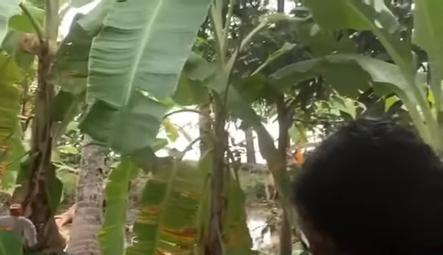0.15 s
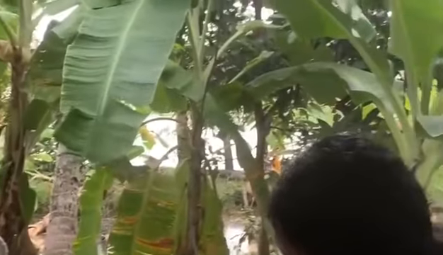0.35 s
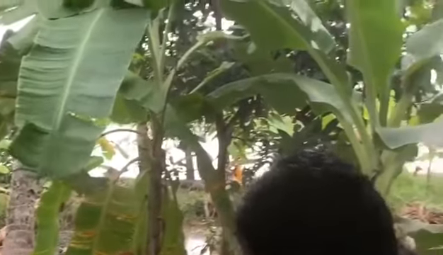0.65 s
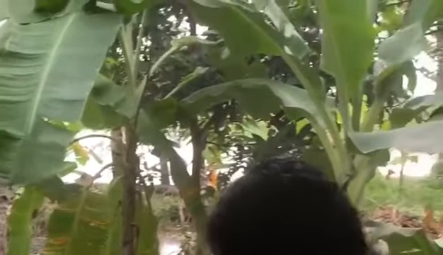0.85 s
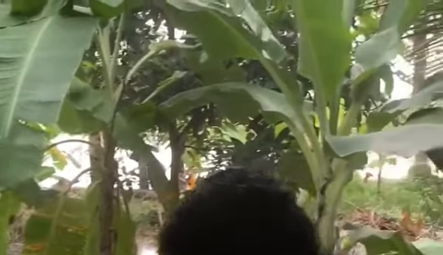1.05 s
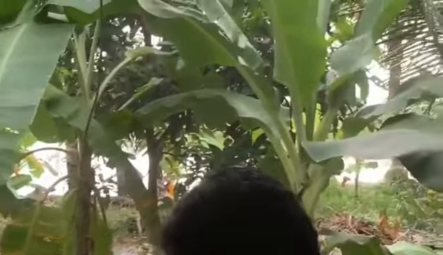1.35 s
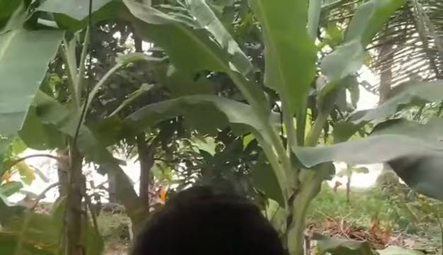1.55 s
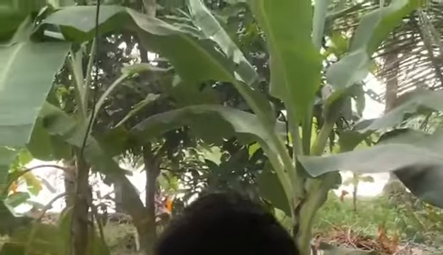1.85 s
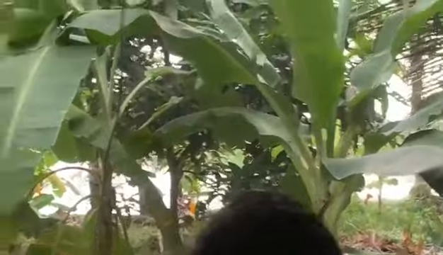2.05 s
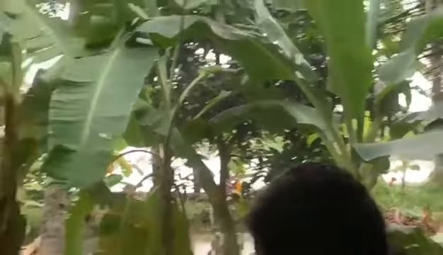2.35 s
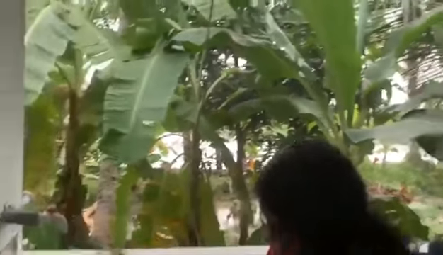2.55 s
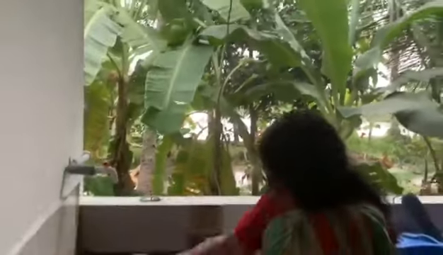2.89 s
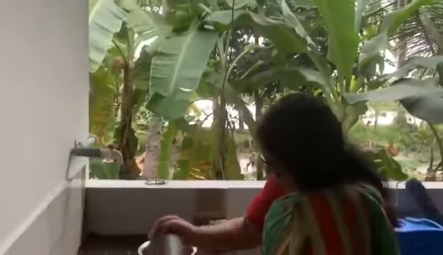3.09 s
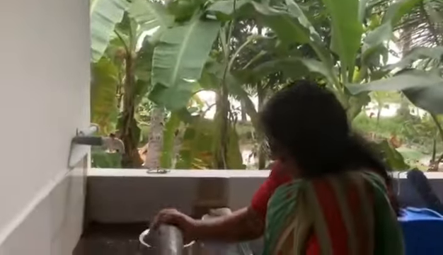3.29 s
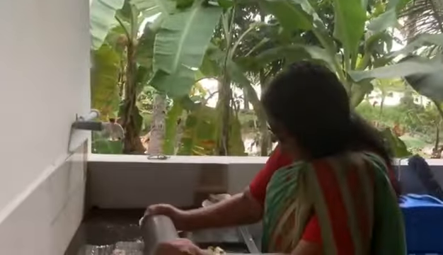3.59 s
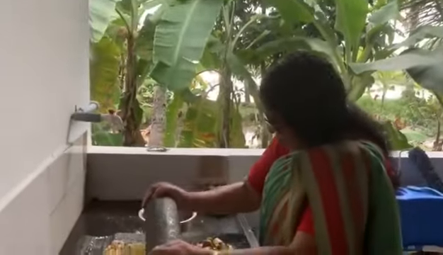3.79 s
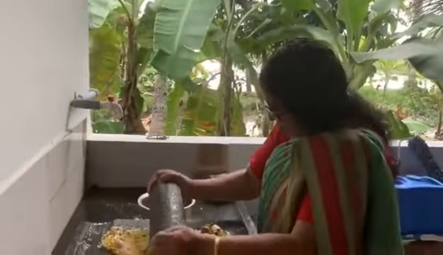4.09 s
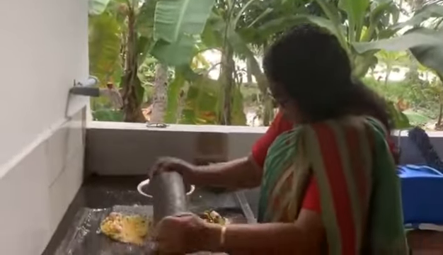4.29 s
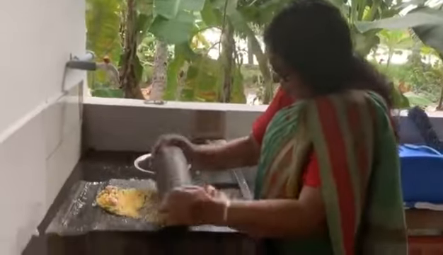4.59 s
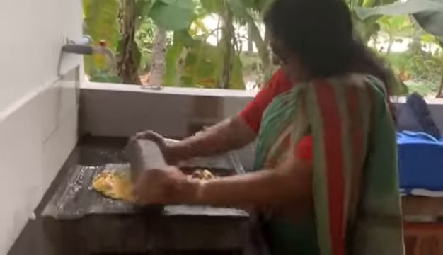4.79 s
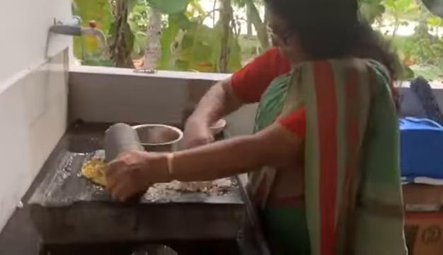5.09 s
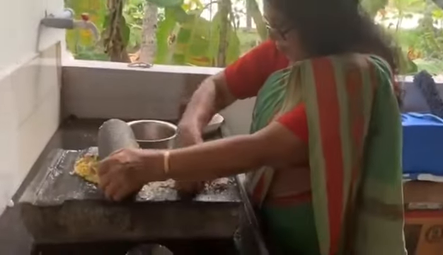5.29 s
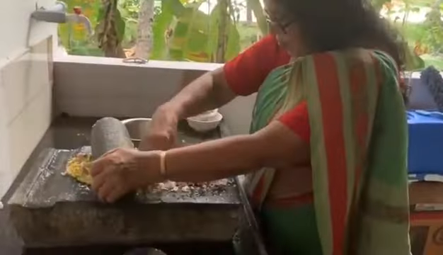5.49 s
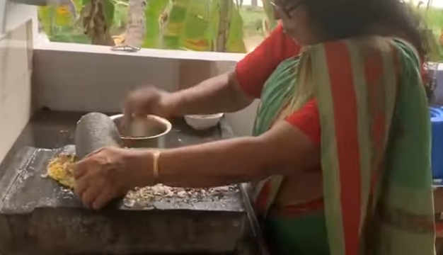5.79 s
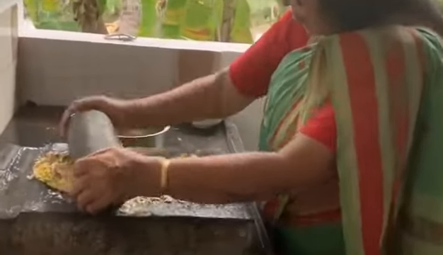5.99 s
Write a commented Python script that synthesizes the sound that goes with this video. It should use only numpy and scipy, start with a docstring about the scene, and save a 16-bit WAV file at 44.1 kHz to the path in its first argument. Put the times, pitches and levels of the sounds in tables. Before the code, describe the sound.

A heavy stone roller crunches coarse wet paste, hisses along, falls quiet, then clacks and thumps on bare stone amid faint garden hum.

```python
"""Stone roller grinding spice paste

A stone roller rocks over paste on a flat stone on an open verandah. Random grains make gritty scrapes
and single-cycle snaps, patchy noise makes hissing slides, and low sines make counter thuds and rumble.
Bare-stone knocks are ringing modes with crunching grains; a short noise tail answers from the walls.
Behind lie noise bands for insects, air and a low drone, and sine orders for a far engine."""
import sys
import numpy as np
from scipy import signal
from scipy.fft import rfft, irfft, next_fast_len
from scipy.io import wavfile
from scipy.ndimage import uniform_filter1d, map_coordinates

SR = 44100
rng = np.random.default_rng(int(sys.argv[2]) if len(sys.argv) > 2 else 0)


def to_wav(s):
    """Save 16-bit WAV."""
    ch = np.atleast_2d(s).T  # columns
    pcm = np.round(np.clip(ch, -1, 1) * 32767)  # PCM
    wavfile.write(sys.argv[1], SR, pcm.astype(np.int16))


N = 271170  # length in samples


def amp(db):
    """Decibels to linear gain."""
    return 10 ** (np.asarray(db) / 20)


def unit(x):
    """Scale to an rms of 1."""
    return x / np.sqrt(np.mean(x ** 2) + 1e-20)


def along(points, hz):
    """Read (freq_hz, value) points on a log frequency axis."""
    freq_hz, value = np.transpose(points)
    return np.interp(np.log(hz + 1), np.log(freq_hz + 1), value)


def colour(points):
    """The gain of a dB spectrum as a function of frequency."""
    return lambda hz: amp(along(points, hz))


def curves(rows):
    """One value per sample for each column after the time."""
    time_s, *columns = np.transpose(rows)
    return [np.interp(np.arange(N) / SR, time_s, column) for column in columns]


def wobble(rate):
    """A smooth random curve with rate knots a second."""
    knots = rng.standard_normal(int(N * rate / SR) + 4)
    return map_coordinates(knots, [np.arange(N) * rate / SR])


def filtered(x, response):
    """Shape x by a real or complex response of frequency."""
    m = next_fast_len(x.shape[-1] + 4096)
    spectrum = rfft(x, m) * response(np.fft.rfftfreq(m, 1 / SR))
    return irfft(spectrum, m)[..., :x.shape[-1]]


def place(out, start_s, sound):
    """Add one event to a longer signal."""
    out[..., round(start_s * SR):][..., :sound.shape[-1]] += sound


def ports(x, lead, balance):
    """One source at two microphone ports: phase lead and level difference depend on frequency."""
    side = np.array([[.5], [-.5]])  # half of each difference goes to either port
    return filtered(x, lambda hz: amp(side * along(balance, hz)) * np.exp(1j * side * along(lead, hz)))


def grit(n, spectrum, tilt_db, spiky_db, apart, uneven_db):
    """Crushed grains of random size and burst-to-burst colour; the apart share differs between ports."""
    sizes = amp(spiky_db * np.minimum(rng.exponential(1, (3, n)), 5))
    grains = rng.standard_normal((3, n)) * sizes
    grains = grains[0] + apart * grains[1:]
    knots = rng.standard_normal(40)  # one every 600 Hz

    def response(hz):
        uneven = uneven_db * map_coordinates(knots, [hz / 600], mode="nearest")
        tilt = tilt_db * np.log2(hz / 6000 + 1e-3)  # tilt_db per octave
        return amp(along(spectrum, hz) + uneven + tilt)

    return unit(filtered(grains, response))


def rush(middle, sides, side_db, patchy_db):
    """Wide noise in patches of random gain: a part shared by both ports (rms 1) and a part opposite."""
    z = signal.stft(rng.standard_normal((2, N)), nperseg=512)[2]
    field = rng.standard_normal(z.shape)
    field = uniform_filter1d(uniform_filter1d(field, 4, 1), 12, 2)  # smooth over frequency, then time
    pair = signal.istft(z * amp(patchy_db * unit(field)), nperseg=512)[1][:, :N]
    mid = unit(filtered(pair[0], middle))
    side = amp(side_db) * unit(filtered(pair[1], sides))
    return np.array([mid + side, mid - side])


def rings(modes, t, tilt_db, hold, blur):
    """Modes of random strength, fed for hold seconds: rough contact blurs pitch, low ones rise later."""
    hz, level_db, t60_s = np.transpose(modes)[:, :, None]
    strength_db = 2.5 * rng.standard_normal((len(modes), 1))
    decay_db = -60 * np.maximum(t - hold, 0) / t60_s
    gain = amp(level_db + tilt_db * np.log2(hz / 600) + strength_db + decay_db)
    steps = rng.standard_normal((len(modes), len(t)))
    wander = blur * np.sqrt(hz / SR) * np.cumsum(steps, 1)
    attack = 1 - np.exp(-.7 * hz * t)
    return np.sum(gain * attack * np.sin(2 * np.pi * hz * t + wander), 0)


# Short scrapes of the rocking roller: bite_s, level_db [before shaping], bite_jump_db, grind_length_s
SCRAPES = [(0.216, -28, 10.5, 0.014), (0.293, -29, 6, 0.0088), (.521, -28, 18.5, 0.017),
           (0.615, -26.5, 4.5, 0.003), (0.808, -34.5, 31, 0.006), (0.824, -25.5, 1.5, 0.0014),
           (0.896, -27, -4, 0.003), (1.086, -36, 17, 0.00092), (3.289, -26, 8.5, 0.0014),
           (3.656, -29.5, 4, 0.0072), (3.76, -27.5, 26, 0.019), (3.778, -22, 25, 0.013),
           (3.959, -27.5, 23.5, 0.0059), (3.975, -24, 3.5, 0.0041), (4.053, -36, 14, 0.014),
           (4.064, -22, 0, 0.0095), (4.083, -24, 28, .0044), (4.267, -26.5, 12.5, 0.0095),
           (4.36, -26.5, 9, 0.0043), (4.543, -30.5, 20, 0.017), (4.557, -26, 11.5, 0.01),
           (4.664, -27, 14, 0.008), (4.85, -27.5, 5.5, 0.012), (4.924, -33.5, 8, 0.011)]
# Grain spectrum before rms levelling: freq_hz, relative_db
GRIT_SPECTRUM = [(600, -20), (1000, -15.5), (1600, -15), (2800, -8.5), (4500, -4.5), (7000, 1), (8500, -2),
                 (10500, 7.5), (11600, -2.5), (12300, -7)]
# Stereo phase of grit, high ringing and insects: freq_hz, left_lead_rad
GRIT_LEAD = [(0, -13), (430, 13), (780, 7), (2670, -1.5), (3100, -2), (3960, -2), (5080, 5.5), (8010, -3.5),
             (10700, -4.5), (12300, -24)]
# tilt in dB per octave at the usual level, and how far it drops per dB of extra level
USUAL_SCRAPE_DB, SCRAPE_TILT_DB, DULLER_PER_DB = -29, -1, 0.71


def scrapes():
    """Each rock creeps in, bites, grinds unevenly and dies away; heavier scrapes sound duller."""
    out = np.zeros((2, N + SR))
    t = np.arange(SR // 4) / SR - .04  # the bite is at zero
    for bite_s, level_db, jump_db, length_s in SCRAPES:
        tilt_db = SCRAPE_TILT_DB - DULLER_PER_DB * (level_db - USUAL_SCRAPE_DB)
        after = np.maximum(t - length_s, 0)
        creep = amp(760 * np.minimum(t, 0) - jump_db * np.clip(-t / 0.003, 0, 1))
        fade = amp(-60 * after / 0.042) + amp(-8.5 - 60 * after / 0.23)  # fast and slow decay
        lumps = amp(1.5 * map_coordinates(rng.standard_normal(150), [(t - t[0]) * 380]))  # clumps break
        grains = grit(len(t), GRIT_SPECTRUM, tilt_db, spiky_db=4.5, apart=0.66, uneven_db=2.5)
        burst = ports(creep * fade * lumps * grains, GRIT_LEAD, [(1, 0.51)])
        place(out, bite_s + t[0], amp(level_db) * burst)
    return out[:, :N]


# Long slides and faint rustles: middle_s, hiss_level_db [shared part], length_s
SLIDES = [(1.117, -58.5, 0.16), (1.43, -69, 0.13), (1.277, -45.5, 0.19), (1.593, -44, 0.19),
          (1.747, -56.5, 0.15), (1.9, -48, 0.18), (2.95, -56.5, .08), (6.081, -59, 0.11)]
# Hiss shared by both ports, before rms levelling: freq_hz, relative_db
HISS_SPECTRUM = [(1470, -5.5), (2500, -1), (6770, 6.5), (8630, -14), (9110, -3.5), (10400, 9.5),
                 (11800, -2.5), (12500, -61), (22000, -120)]
# Hiss opposite at the ports, before rms levelling: freq_hz, relative_db
HISS_SIDE_SPECTRUM = [(1470, -11), (2500, -8), (9230, -9), (10400, -12), (12500, -95), (22000, -120)]


def slides():
    """Long strokes hiss as patchy noise, swelling and fading with a flickering level."""
    hiss = rush(colour(HISS_SPECTRUM), colour(HISS_SIDE_SPECTRUM), side_db=-0.9, patchy_db=2.0)
    t = np.arange(N) / SR
    push = np.zeros(N)
    for middle_s, level_db, length_s in SLIDES:
        push += amp(level_db) * np.exp(-np.abs(2 * (t - middle_s) / length_s) ** 3)
    flicker = amp(0.73 * wobble(31.6) + 1.6 * wobble(400))
    return push * flicker * hiss


# Stone on bare stone: start_s, level_db [before the first-blow boost], chatter_s, tilt_db_per_octave
KNOCKS = [(3.3752, -16.5, 0.025, 1.5), (3.763, -15.5, 0.016, 2.5), (3.987, -19, 0.0079, 0.4),
          (4.0679, -14.5, 0.011, 3), (4.287, -23.5, 0.0025, -4), (4.373, -27.5, 0.006, -3.5),
          (4.566, -23, 0.0056, 1.5), (4.579, -30.5, 0.0016, 1), (4.698, -28, 0.0064, -6)]
# Slab modes: pitch_hz, relative_db, t60_s [before the knock's extra 150 dB/s fall]
SLAB_MODES = [(314.7, 3.5, 0.094), (412.4, -2, 0.23), (481, -10.5, 0.19), (518.5, 1, 0.026),
              (603.3, -2, 0.021), (661, -1.5, 0.031), (770, -2.5, 0.019), (1012, -11, 0.052),
              (1075, -15.5, 0.19), (1143.4, -11, 0.15), (1256, -16, 0.023), (1406, -9.5, 0.033),
              (1543, -15, 0.085), (1766, -16, 0.064), (2020, -23, 0.11), (2350, -28, 0.1)]
# Crunch spectrum before rms levelling: freq_hz, relative_db
CRUNCH_SPECTRUM = [(120, -15), (230, 3), (526, 1), (904, -12), (1410, -9.5), (2450, -17.5), (2900, -25),
                   (6000, -43), (7800, -67), (13200, -120)]
# Stereo phase of slab and counter: freq_hz, left_lead_rad
SLAB_LEAD = [(0, 3), (430, -1.15), (860, 5.5), (3450, 9.5), (4050, 10.5), (6120, 6), (10500, -25),
             (12300, 23)]
# Stereo level of slab and counter: freq_hz, left_minus_right_db
SLAB_BALANCE = [(60, 4), (350, 1.5), (2070, 6), (12100, -16)]
FIRST_BLOW_DB, FIRST_BLOW_S = 7, 0.0048  # the first contact stands over the chatter and fades into it
SETTLE_S, MUFFLE_DB_PER_S = 0.066, 900  # the roller sinks into the paste, which muffles the ring
CRUNCH_SHARE = .7  # linear gain


def knocks():
    """A blow rings the slab while the roller crunches and chatters, until it sinks into the paste."""
    out = np.zeros((2, N + SR))
    t = np.arange(SR // 4) / SR
    attack = 1 - np.exp(-t / 0.0001)
    first_blow_db = FIRST_BLOW_DB * np.exp(-t / FIRST_BLOW_S)
    muffle_db = -MUFFLE_DB_PER_S * np.maximum(t - SETTLE_S, 0)
    for start_s, level_db, chatter_s, tilt_db in KNOCKS:
        ring = rings(SLAB_MODES, t, tilt_db, chatter_s, blur=0.022) * amp(-150 * t)
        grains = grit(len(t), CRUNCH_SPECTRUM, tilt_db, spiky_db=1.0, apart=0.47, uneven_db=3.5)
        crunch = CRUNCH_SHARE * amp(-60 * np.maximum(t - chatter_s, 0) / 0.12) * grains
        place(out, start_s, amp(level_db + first_blow_db + muffle_db) * attack * (ring + crunch))
    return ports(out[:, :N], SLAB_LEAD, SLAB_BALANCE)


# Roller bounces: start_s, level_db [added to each mode's]
BOUNCES = [(3.38, -37), (3.775, -25), (4.084, -16), (4.556, -29)]
# Roller mode pitches: pitch_hz
ROLLER_HZ = [2315, 3160, 3790, 4935, 5170, 6800, 10330, 10560]
# The same modes in order: relative_db, t60_s
ROLLER_DECAYS = [(-17, 0.1), (-19, 0.13), (-8, 0.06), (-14, 0.08), (-20, 0.1), (-8, 0.15), (-4.5, 0.089),
                 (-10, 0.09)]


def bounces():
    """The bouncing roller rings in high modes whose pitch is blurred by rough contact."""
    out = np.zeros(N + SR)
    t = np.arange(SR // 4) / SR
    modes = np.c_[ROLLER_HZ, ROLLER_DECAYS]
    for start_s, level_db in BOUNCES:
        place(out, start_s, amp(level_db) * rings(modes, t, 0, 0, blur=.22))
    return ports(out[:N], GRIT_LEAD, [(1, .4)])


# The roller's weight landing on the counter: start_s, level_db [before attack and decay], pitch_hz
THUDS = [(0.236, -23, 165), (0.319, -23.5, 123.3), (.55, -16, 152), (0.63, -21.5, 145),
         (0.838, -11.5, 155.4), (0.903, -19, 147), (3.382, -18, 131), (3.775, -10, 154.4),
         (3.994, -13, 131), (4.082, -7, 149), (4.298, -14.5, 137), (4.385, -13.5, 157), (4.576, -10.5, 168),
         (4.676, -19, 144), (4.8707, -13.5, 147.6)]
THUD_CYCLES, THUD_FREE_CYCLES = 20.5, 5.64  # cycles per 60 dB of free fall; cycles until hands press it


def thuds():
    """The counter answers with two low, soft-edged sines, then the hands press it still."""
    out = np.zeros(N + SR)
    t = np.arange(SR // 2) / SR
    attack = 1 - np.exp(-t / 0.0044)
    for start_s, level_db, hz in THUDS:
        body = np.sin(2 * np.pi * hz * t) + 0.41 * np.sin(2 * np.pi * 0.797 * hz * t)
        free_db = -60 * t * hz / THUD_CYCLES
        pressed_db = -MUFFLE_DB_PER_S * np.maximum(t - THUD_FREE_CYCLES / hz, 0)
        place(out, start_s, amp(level_db + free_db + pressed_db) * attack * body)
    return ports(out[:N], SLAB_LEAD, SLAB_BALANCE)


# The roller rumbling along the slab: middle_s, level_db [main sine], length_s
ROLLS = [(0.218, -30, 0.028), (0.521, -37, 0.071), (0.66, -41, 0.027), (0.806, -33, 0.036),
         (0.836, -20.5, 0.0083), (0.959, -32, 0.014), (1.072, -41, 0.04545), (3.655, -40.5, 0.017),
         (3.965, -40, 0.062), (4.043, -34, 0.036), (4.274, -28.5, 0.014), (4.55, -31, 0.017),
         (4.719, -30, 0.015), (4.822, -32.5, 0.041), (4.857, -37.5, 0.035)]
ROLL_HZ = 337.2  # centre of the wavering pitch


def rolling():
    """Rolling makes the counter rumble higher than the thuds, as two sines of wavering pitch."""
    out = np.zeros(N + SR)
    t = np.arange(SR // 5) / SR - .1
    for middle_s, level_db, length_s in ROLLS:
        drift = map_coordinates(rng.standard_normal(30), [(t - t[0]) * 90])
        cycles = ROLL_HZ * t + np.cumsum(0.1218 * ROLL_HZ * drift) / SR
        body = np.sin(2 * np.pi * cycles) + .5 * np.sin(2 * np.pi * 1.45 * cycles)
        swell = np.exp(-(2 * t / length_s) ** 2 / 2)
        place(out, middle_s + t[0], amp(level_db) * swell * body)
    return ports(out[:N], SLAB_LEAD, SLAB_BALANCE)


# Single hard grains snapping: middle_s, peak_db [before stereo], centre_hz
SNAPS = [(0.2135, -13, 10500), (0.521, -28, 7000), (0.614, -16, 5970), (2.635, -36, 794),
         (4.5601, -8.5, 7100)]
# Stereo level of snaps, air and engine: freq_hz, left_minus_right_db
AIR_BALANCE = [(60, 3.2), (850, 1.85), (12100, 0.13)]


def snaps():
    """Each grain breaks in a single cycle, a downward spike between two small humps."""
    out = np.zeros(N)
    t = np.arange(-200, 200) / SR
    for middle_s, peak_db, hz in SNAPS:
        u = (np.pi * hz * t) ** 2
        place(out, middle_s + t[0], -amp(peak_db) * (1 - 2 * u) * np.exp(-u))
    return ports(out, [(1, 0)], AIR_BALANCE)


# Decay of the verandah walls: freq_hz, t60_s
WALLS = [(200, 0.19), (2000, 0.24), (10000, 0.005)]


def verandah(x):
    """The walls answer 200 samples late with a noise tail; each frequency dies at its own speed."""
    hz, t, z = signal.stft(rng.standard_normal((2, SR // 2)), SR, nperseg=256)
    decay = amp(-60 * t / along(WALLS, hz)[:, None])
    tail = signal.istft(z * decay, SR, nperseg=256)[1]
    late = np.pad(x, ((0, 0), (200, 0)))
    return signal.fftconvolve(late, tail / np.linalg.norm(tail[0]), axes=1)[:, :N]


# Insect chorus: time_s, level_db [before flutter and stereo], centre_hz
INSECTS = [(0, -52, 9530), (.2, -55, 9800), (1.83, -54, 9750), (2.83, -51.5, 9610), (3.1, -55.5, 9650),
           (4.2, -58.5, 9380), (4.74, -53, 9700), (5.14, -53, 9400), (6.15, -57.5, 9700)]


def insects():
    """A narrow noise band is carried up to a drifting centre pitch, with a fluttering level."""
    level_db, centre_hz = curves(INSECTS)
    band = unit(filtered(rng.standard_normal((2, N)), lambda hz: np.exp(-(hz / 550) ** 3)))
    turn = 2 * np.pi * np.cumsum(centre_hz) / SR
    carried = band[0] * np.cos(turn) + band[1] * np.sin(turn)
    chorus = amp(level_db + 0.67 * wobble(9.9)) * carried
    return ports(chorus, GRIT_LEAD, [(1, .3)])


# Far engine: time_s, firing_rate_hz [before a slight waver], other_orders_db, fifth_sixth_db
ENGINE = [(0, 24.26, -53, -49), (.25, 23.8, -47, -54), (1.0, 25.7, -47.5, -44.5), (1.45, 26.77, -61, -54.5),
          (2.25, 25.3, -55, -43), (3.1, 26.76, -50.5, -51), (5.15, 28.24, -46, -44.5),
          (5.7, 27.96, -48, -50), (6.15, 27.04, -46.5, -52.5)]
# Most multiples of the firing rate: order
OTHER_ORDERS = (2, 3, 4, 7, 9, 10)
# The fifth and sixth multiples, which share a level curve: order
FIFTH_SIXTH_ORDERS = (5, 6)
# Offset from the group level, other orders first, then fifth and sixth: relative_db
ORDER_DB = [3.5, -4.5, -1, -7, -11.5, -9.5, -0.5, -3]


def engine():
    """Sines at orders of the firing rate; each also swells and fades on its own on the way here."""
    firing_hz, other_orders_db, fifth_sixth_db = curves(ENGINE)
    turn = 2 * np.pi * np.cumsum(firing_hz * (1 + 0.002 * wobble(2.99))) / SR
    group_db = [other_orders_db] * len(OTHER_ORDERS) + [fifth_sixth_db] * len(FIFTH_SIXTH_ORDERS)
    out = np.zeros(N)
    for order, order_db, level_db in zip(OTHER_ORDERS + FIFTH_SIXTH_ORDERS, ORDER_DB, group_db):
        gain = np.sqrt(2) * amp(level_db + order_db + 2.77 * wobble(2.396))
        out += gain * np.sin(order * turn + rng.uniform(0, 2 * np.pi))
    return ports(out, [(1, 0.02)], AIR_BALANCE)


# Air shared by both ports, before rms levelling: freq_hz, relative_db
AIR_SPECTRUM = [(120, -3.5), (200, -5), (282, -8), (340, -7.5), (486, -1.5), (654, -18.5), (981, -10),
                (1150, -16), (2170, -17), (2550, -17), (2750, -21.5), (3810, -25.5), (7100, -31),
                (8300, -46), (10800, -102), (18300, -120)]
# Air opposite at the ports, before rms levelling: freq_hz, relative_db
AIR_SIDE_SPECTRUM = [(120, -18), (200, 3), (323, -6.5), (723, -1), (3810, -20.5), (5100, -24.5),
                     (6370, -30), (9600, -19), (12000, -94), (15600, -82), (22000, -120)]
# Far low drone: time_s, level_db [shared part, before its wobble]
RUMBLE = [(0, -48.5), (3.08, -43), (6.15, -44)]
# Drone resonances before rms levelling: centre_hz, half_width_hz, relative_db
DRONE = [(53, 19.6, 7), (107.5, 11, -2), (251, 36, -11.5), (140, 79, -3)]
AIR_DB = -48.5  # shared part, before stereo


def drone_response(hz):
    """The low drone's resonances, each a rounded peak."""
    return sum(amp(db) * w * w / (w * w + (hz - c) ** 2) for c, w, db in DRONE)


def outdoor_air():
    """A murmur of wide, patchy noise over a far low drone of resonant noise."""
    level_db, = curves(RUMBLE)
    air = amp(AIR_DB) * rush(colour(AIR_SPECTRUM), colour(AIR_SIDE_SPECTRUM), side_db=1.0, patchy_db=2.5)
    drone = rush(drone_response, drone_response, side_db=-5.5, patchy_db=0.5)
    low = amp(level_db + 1.8 * wobble(4.27)) * drone
    return ports(air + low, [(1, 0.02)], AIR_BALANCE)


def scene():
    """Roller and slab with their walls, over the garden."""
    work = scrapes() + slides() + knocks() + bounces() + thuds() + rolling() + snaps()
    garden = insects() + engine() + outdoor_air()
    return work + amp(-11.0) * verandah(work) + garden


TOP_HZ = 12721  # band limit


def record(dry):
    """The microphone loses deep bass and top treble; peaks round off; nothing passes the band limit."""
    def microphone(hz):
        bass = (hz / 45) ** 4
        return bass / (1 + bass) / (1 + (hz / 11900) ** 40)

    heard = filtered(dry, microphone)
    soft = heard / (1 + np.abs(heard / .97) ** 10) ** (1 / 10)
    return filtered(soft, lambda hz: hz < TOP_HZ)


dry = scene()
out = record(dry)
to_wav(out)
```